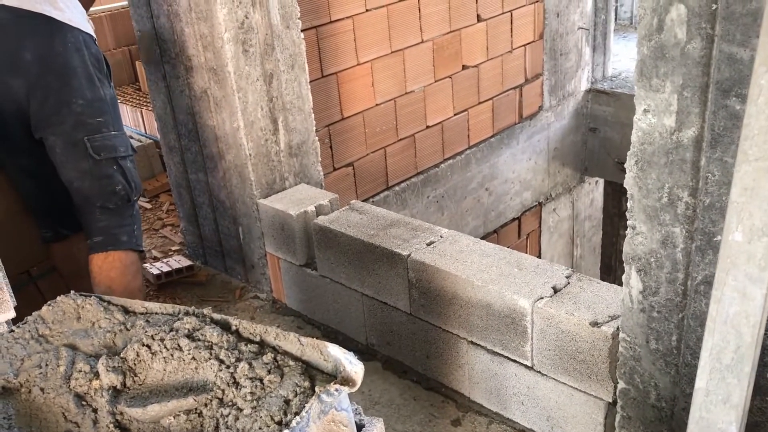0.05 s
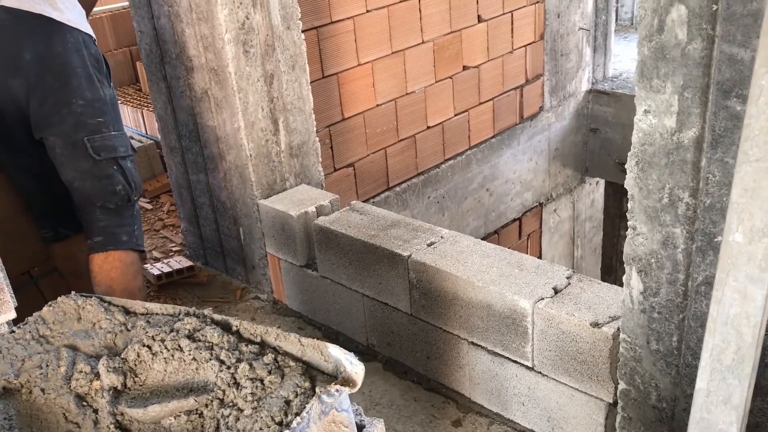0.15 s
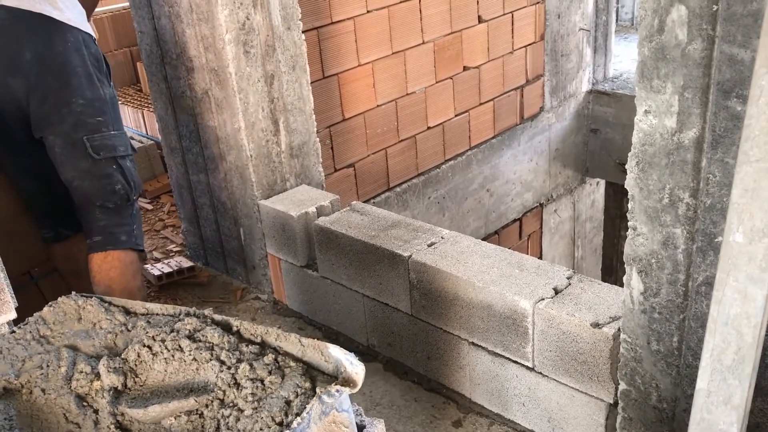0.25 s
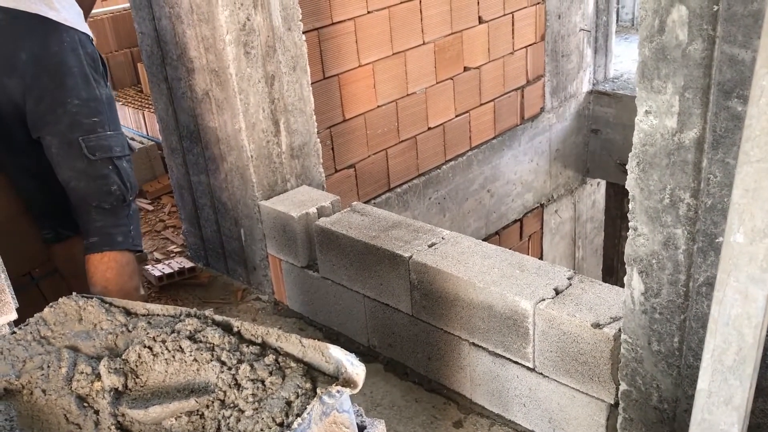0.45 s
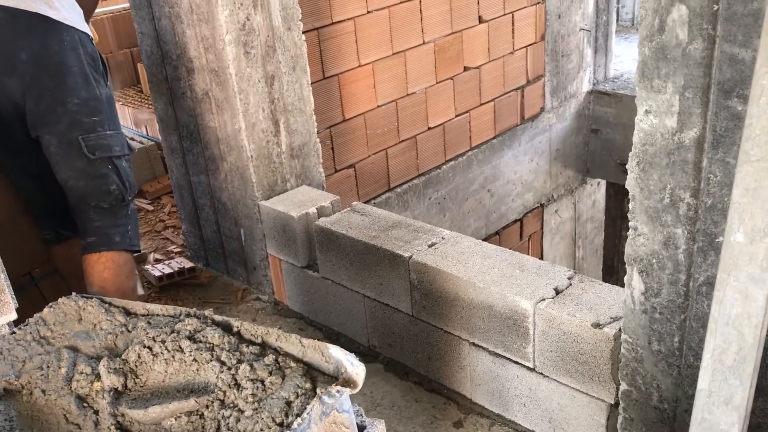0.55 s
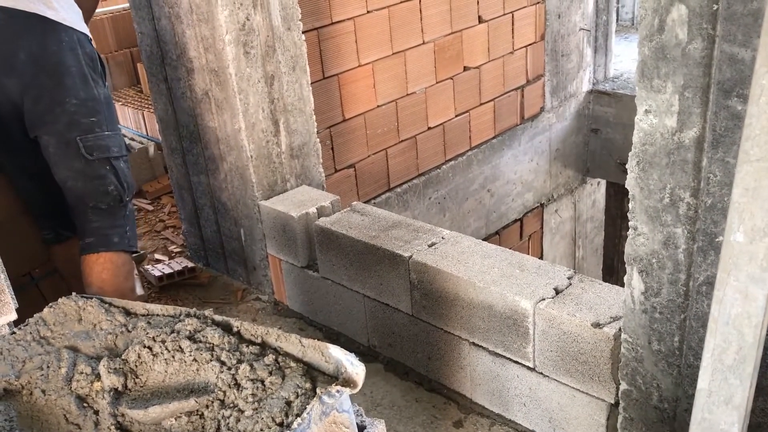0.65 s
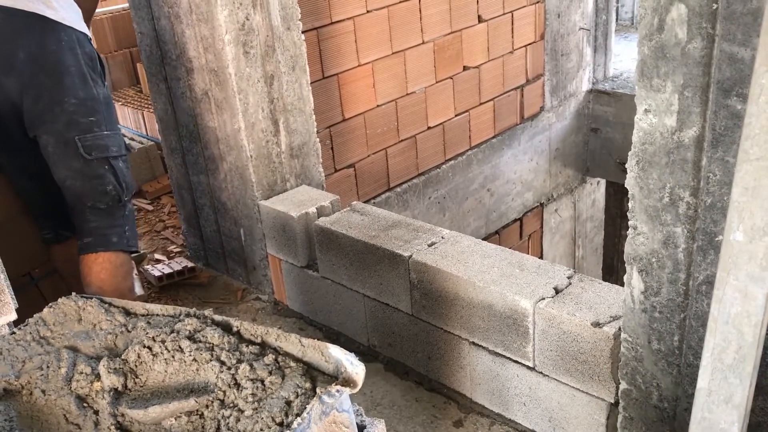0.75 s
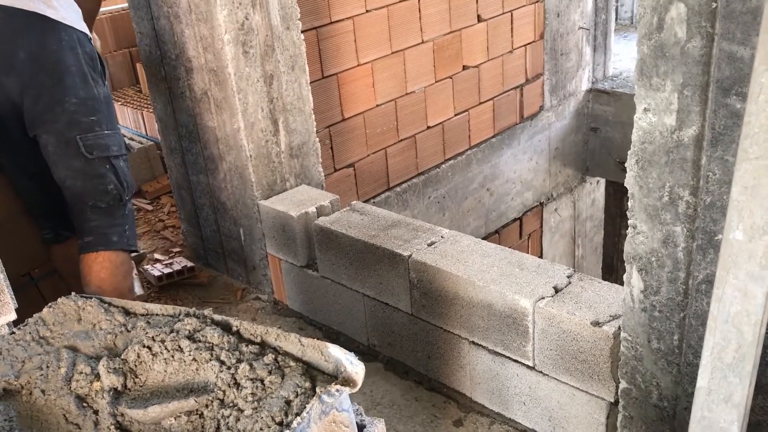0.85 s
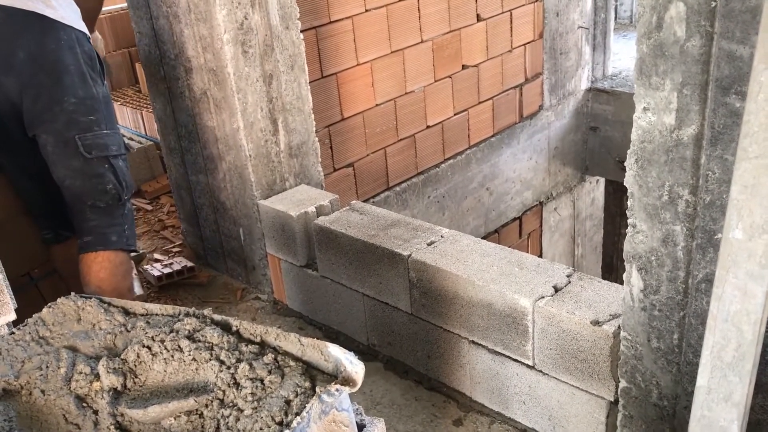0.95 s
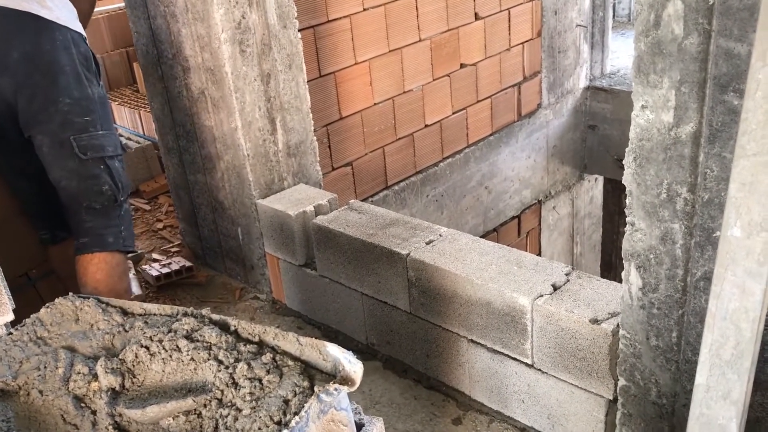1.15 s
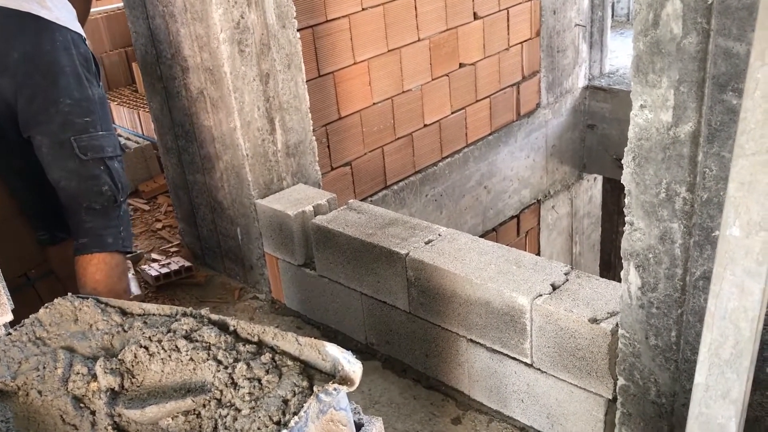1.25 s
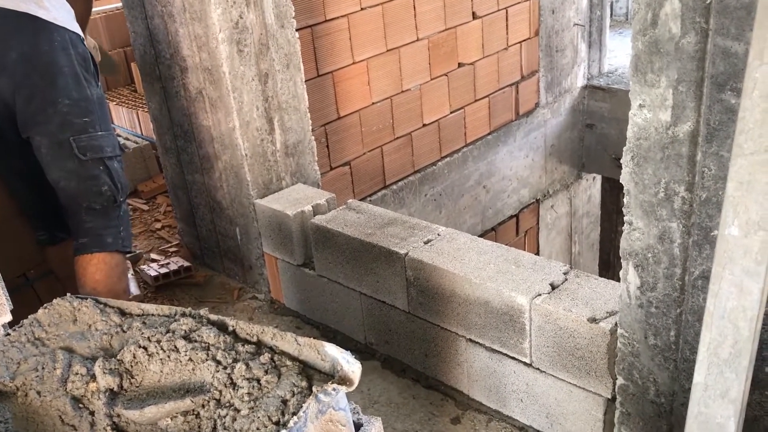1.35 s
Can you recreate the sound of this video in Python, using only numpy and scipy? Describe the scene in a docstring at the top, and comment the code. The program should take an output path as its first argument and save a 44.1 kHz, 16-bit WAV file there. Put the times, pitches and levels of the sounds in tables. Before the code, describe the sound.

Sharp hammer knocks on clay brick, with shards clinking onto rubble in a bare room.

```python
"""Trimming a clay brick

A mason hammers a hollow clay brick in a bare concrete building. After a light tap, four sharp blows
crack it (bursts of noise) and make it ring (fading tones). Broken pieces drop on the rubble between them.
A dull scuff comes before the second blow, weight shifts on the floor, and the site rumbles faintly."""
import sys
import numpy as np
from scipy import signal
from scipy.fft import irfft
from scipy.io import wavfile

SR = 44100
rng = np.random.default_rng(int(sys.argv[2]) if len(sys.argv) > 2 else 0)


def bounce(signal):
    """Save signal as a 16-bit WAV file at the path given by the first command-line argument."""
    frames = np.transpose(np.atleast_2d(signal))
    limited = np.clip(frames, -1, 1)
    pcm = np.round(limited * 32767).astype(np.int16)
    wavfile.write(sys.argv[1], SR, pcm)


N = 61739

# The tone colour of cracking clay: pitch_hz, level_db
CLAY_COLOUR = [(60, -27), (180, -14.5), (450, -33.5), (620, -13), (800, -7.5), (1050, 0.5), (1600, 1),
               (1980, -4), (2550, 4.5), (3400, 1), (4700, -1), (7000, -1.5), (10000, -10), (15500, -15)]


def amp(db):
    """Turns decibels into a number to multiply a sound by."""
    return 10 ** (np.asarray(db) / 20)


def fade(t, fade_s):
    """A fade that falls by 60 dB every fade_s seconds."""
    return np.exp(-np.log(1000) * t / fade_s)


def value_at(points, hz):
    """Reads a table between its pitches, on a scale of octaves."""
    pitches, values = np.transpose(points)
    return np.interp(np.log(hz + 1), np.log(abs(pitches) + 1), values)


def loudness(points):
    """A volume curve drawn through points of time and level."""
    return amp(np.interp(np.arange(N) / SR, *np.transpose(points)))


def add(mix, start_s, sound):
    """Mixes a sound in, cutting off whatever falls outside the mix."""
    at = round(start_s * SR)
    sound = sound[max(-at, 0):]
    part = mix[max(at, 0):][:len(sound)]
    part += sound[:len(part)]


def noise(colour, size, tilt_db=0):
    """Coloured noise of level one; each octave above 800 Hz gains tilt_db."""
    hz = np.fft.rfftfreq(size, 1 / SR)
    strength = amp(value_at(colour, hz) + tilt_db * np.log2(np.maximum(hz, 800)))
    x = irfft(strength * np.exp(2j * np.pi * rng.random(len(hz))), size)
    return x / x.std()


def site_rumble():
    """The steady low rumble and faint hiss of the building site."""
    # pitch_hz, level_db
    rumble_colour = [(20, -20), (40, -6.5), (62, 4), (90, -5), (150, -3.5), (250, -12), (450, -22.5),
                     (1000, -15.5), (2500, -12), (4500, -15.5), (8000, -24.5), (15500, -30)]
    return amp(-45) * noise(rumble_colour, N)


def crack(colour, level_db, tilt_db, fade_s):
    """Breaking clay gives a gritty burst of noise whose treble dies first."""
    t = np.arange(SR // 2) / SR
    grit_db, grain_s, rise_s, treble_speed = 2.5, 0.0006, 0.00034, 1.084
    grit = amp(grit_db * np.interp(t / grain_s, np.arange(2600), rng.standard_normal(2600)))
    burst = noise(colour, len(t), tilt_db) * grit / np.sqrt(np.mean(grit ** 2))
    low = signal.sosfiltfilt(signal.butter(2, 4000, fs=SR, output="sos"), burst)
    treble = burst - low
    fading = low * fade(t, fade_s) + treble * fade(t, fade_s / treble_speed)
    return amp(level_db) * (1 - np.exp(-t / rise_s)) * fading


def ring(level_db, body):
    """Struck clay vibrates at several pitches, each fading at its own speed."""
    # Tones of the brick as it breaks and is turned, of a shard and of a chip: pitch_hz, level_db, fade_s
    clay_tones = {"tapped": [(1100, -12, 0.31), (1765, -12, 0.53), (2160, 1, .28), (3160, -9, .2),
                  (3967, -9.5, 0.38), (5370, -15, .28)], "whole": [(1022, -7.5, 0.25), (1253, -22, 0.35),
                  (1381, -6, 0.16), (1809, -7.5, 0.43), (1845, -9.5, 0.41), (2043, -17, 0.6),
                  (2520, -5.5, 0.097), (2828, 3.5, 0.11), (2848, -13, 0.35), (3203, -6, 0.11),
                  (3610, -12, 0.11), (3993, 6, 0.057), (5166, -18, 0.074), (6705, -3.5, 0.066)],
                  "cracked": [(1013, -10.5, 0.3), (1096, -2.5, 0.18), (1170, -7.5, 0.21), (1392, -5.5, .14),
                  (1600, -8, 0.19), (1785, -6.5, 0.32), (2351, -8, .14), (2744, -4.5, 0.17),
                  (2834, -3.5, 0.083), (3215, -6.5, 0.06), (3365, 1, 0.049), (4360, -16.5, 0.17),
                  (5970, -20, .2), (5410, -8.5, 0.14), (6860, -12.5, .2), (7970, -14.5, 0.16)],
                  "chipped": [(916, -12, 0.34), (1103, 10.5, 0.055), (1213, -2.5, 0.16), (1334, 1.5, 0.18),
                  (1620, -0.5, 0.14), (1802, -11.5, 0.41), (2542, 6, 0.096), (2680, -10, 0.51),
                  (2600, -26, 0.14), (3270, 6, 0.072), (3690, -4, 0.073), (5140, -28, 0.14),
                  (7000, -17, 0.46)], "turned": [(775.4, -18.5, 0.28), (977.4, -0.5, 0.19),
                  (1008, -4, 0.29), (1232, -4.5, 0.16), (1347, 0, 0.06), (1622, -3, 0.14), (1680, -10, 0.3),
                  (2117, -13, 0.5), (2397, -6.5, 0.069), (2707, -11.5, 0.3), (3050, -14, 0.072),
                  (4191, -6, 0.14), (4260, -5.5, 0.22), (5719, -8, 0.2)], "shard": [(1152, 1.5, 0.16),
                  (1510, -29, 0.15), (1915, -9, 0.25), (2405, -12, 0.27), (3220, -16, 0.25),
                  (3550, 0.5, 0.055), (4825, -8, 0.13), (5300, -3, 0.044)], "chip": [(1320, -8, 0.2),
                  (3100, -5, 0.2), (4220, 5.5, 0.2), (4280, 10, 0.15), (4400, 5, 0.13), (4590, 5, 0.059),
                  (5520, -7, 0.3)]}
    t = np.arange(SR // 2) / SR
    rise_s, trim_db = 0.0014, -2.5
    tones = sum(amp(db) * fade(t, fade_s) * np.sin(2 * np.pi * (hz * t + rng.random()))
                for hz, db, fade_s in clay_tones[body])
    return amp(level_db + trim_db) * (1 - np.exp(-t / rise_s)) * tones


def impacts(hits, colour):
    """Each hit cracks and rings; returns one track of cracks and one of rings."""
    cracks, rings = np.zeros(N), np.zeros(N)
    for start_s, crack_db, tilt_db, fade_s, ring_db, body in hits:
        add(cracks, start_s, crack(colour, crack_db, tilt_db, fade_s))
        add(rings, start_s, ring(ring_db, body))
    return np.array([cracks, rings])


def hammer_blows():
    """The hammer taps once, then touches the brick two or three times in each blow."""
    # start_s, crack_db, tilt_db_per_octave, crack_fade_s, ring_db, body (what rings)
    contacts = [(-.03, -16.5, -0.8, 0.14, -21, "tapped"), (.196, -21.5, -1, 0.18, -36, "whole"),
                (.2024, -6, 2, 0.047, -34, "whole"), (.2122, -10, -3.1, 0.066, -13.5, "whole"),
                (.454, -18.5, -2, 0.19, -38, "cracked"), (.4622, -7.5, 0.5, 0.066, -17.5, "cracked"),
                (.4762, -9, 0, 0.023, -9, "cracked"), (.7283, -18, -4, .02, -43, "chipped"),
                (.7303, -6.5, -0.2, 0.046, -19, "chipped"), (1.1525, -3.5, -0.27, 0.036, -17.5, "turned"),
                (1.1635, -17.5, -12, 0.047, -13, "turned")]
    return impacts(contacts, CLAY_COLOUR)


def room_echo(sound):
    """Sound bounces quickly off nearby walls, then lingers in the bare room."""
    # How long the room rings: pitch_hz, fade_s
    room_fades = [(150, 0.15), (1000, 0.47), (2500, 0.42), (5000, 0.33), (9000, 0.3), (15000, 0.2)]
    t = np.arange(SR) / SR
    echoes_per_s, near_db, tail_db = 3000, -7.5, -7
    near_echoes, late_echoes = rng.choice([-1., 1.], (2, SR)) * (rng.random((2, SR)) < echoes_per_s / SR)
    near = near_echoes * (t > 0.003) * fade(t, fade_s=0.064)
    # Split the late echoes by pitch so that each band fades at its own speed.
    hz, age_s, bands = signal.stft(late_echoes * (t > 0.0092), SR, nperseg=256)
    bands = bands * fade(age_s, value_at(room_fades, hz)[:, None])
    tail = signal.istft(bands, SR, nperseg=256)[1][:SR]
    echoes = amp(near_db) * near / np.linalg.norm(near) + amp(tail_db) * tail / np.linalg.norm(tail)
    return signal.fftconvolve(sound, echoes)[:N]


def falling_pieces():
    """Large shards and small chips clatter onto the rubble."""
    # start_s, crack_db, tilt_db_per_octave, crack_fade_s, ring_db, body (what rings)
    landings = [(.030, -31.5, -0.5, 0.098, -66, "chip"), (.097, -33, 2, 0.039, -58, "chip"),
                (.299, -26, -2, 0.024, -45, "chip"), (.410, -33, 18, .01, -60, "chip"),
                (.596, -17, 5.5, 0.034, -46, "shard"), (.608, -24.5, 3, 0.076, -27, "shard"),
                (.621, -15.5, 4.5, 0.036, -21, "shard"), (.679, -31.5, 12, 0.082, -63, "chip"),
                (.835, -26, 14, 0.056, -70, "chip"), (.8535, -23, 1, 0.036, -59, "shard"),
                (.8665, -22, -3, 0.1, -30.5, "shard"), (.8785, -16.5, 0.5, 0.04, -40, "shard"),
                (.886, -39, -8, 0.084, -19.5, "shard"), (.9855, -35.5, 8, .03, -75, "chip"),
                (1.003, -34, 12, 0.071, -83, "chip"), (1.0193, -24.5, 5, 0.02, -36, "chip")]
    # pitch_hz, level_db
    clatter_colour = [(60, -26), (450, -26), (700, -26), (1050, -1.5), (1600, -2.5), (2550, 1), (3600, 2.5),
                      (5000, 0), (6800, -2), (9000, -8.5), (12500, -15.5), (15500, -20)]
    return impacts(landings, clatter_colour)


def level_dips():
    """A volume curve that stays at one apart from three brief dips."""
    # middle_s, half_length_s, depth_db
    dips = [(0.063, 0.0044, -4.5), (0.517, 0.011, -24.5), (1.064, 0.007, -4.5)]
    t = np.arange(N) / SR
    return amp(sum(db * np.exp(-((t - middle_s) / half_s) ** 4) for middle_s, half_s, db in dips))


def floor_scuff():
    """A dull scrape on the gritty floor."""
    # pitch_hz, level_db
    scuff_colour = [(30, -12), (70, 0.5), (110, -1), (180, 2), (300, -6.5), (600, -9.5), (1000, -13.5),
                    (2500, -16), (8000, -49), (15000, -57)]
    # time_s, level_db
    scuff_levels = [(0.338, -73), (0.368, -34), (.42, -38.5), (.48, -38), (.56, -44.5), (.68, -52.5)]
    return noise(scuff_colour, N) * loudness(scuff_levels)


def floor_bumps():
    """Weight shifting on the floor makes soft, short swells of bass."""
    # start_s, level_db
    bumps = [(0.419, -45), (.465, -45), (.585, -36.5), (0.691, -40), (.875, -45), (1.004, -44),
             (1.154, -45), (1.376, -37.5)]
    pitch_hz, rise_s = 63, 0.013
    t, out = np.arange(SR // 5) / SR, np.zeros(N)
    swell = t / rise_s * np.exp(1 - t / rise_s)
    for start_s, level_db in bumps:
        add(out, start_s, amp(level_db) * swell * np.sin(2 * np.pi * (pitch_hz * t + rng.random())))
    return out


def hammer_scrape():
    """The steel edge slides on the brick, swelling into the second blow."""
    # time_s, level_db
    scrape_levels = [(.42, -76), (0.436, -38), (.446, -38.5), (0.448, -25), (.461, -22.5), (.468, -76)]
    return noise(CLAY_COLOUR, N, tilt_db=-1.5) * loudness(scrape_levels)


def scene():
    """Blows and falling pieces echo in the room, over the background."""
    cracks, rings = hammer_blows() + falling_pieces()
    cracks = cracks + hammer_scrape()
    echo = room_echo(cracks + amp(-9.5) * rings)
    noisy = cracks + echo + floor_scuff() + floor_bumps() + site_rumble()
    return (rings + level_dips() * noisy)[None]  # the dips leave the ringing bare


def record(dry):
    """Gently squashes the loudest peaks, then cuts the highest treble."""
    squashed = dry / (1 + dry ** 4) ** 0.25
    treble_cut = signal.firwin(511, cutoff=15900, window=("kaiser", 9), fs=SR)
    return signal.oaconvolve(squashed, treble_cut[None], "same")


dry = scene()
out = record(dry)
bounce(out)
```